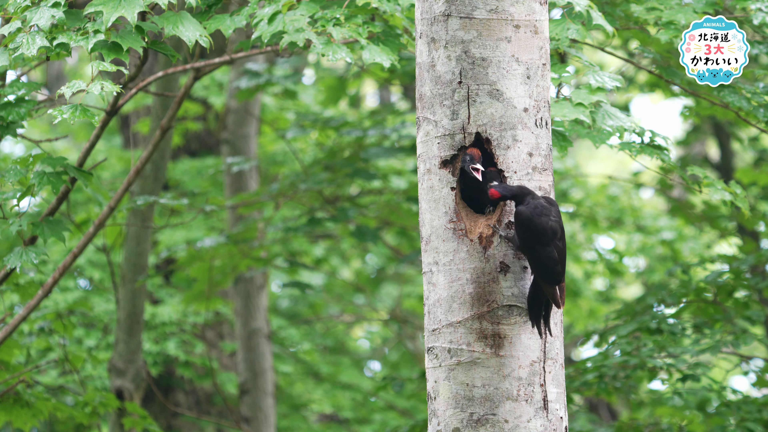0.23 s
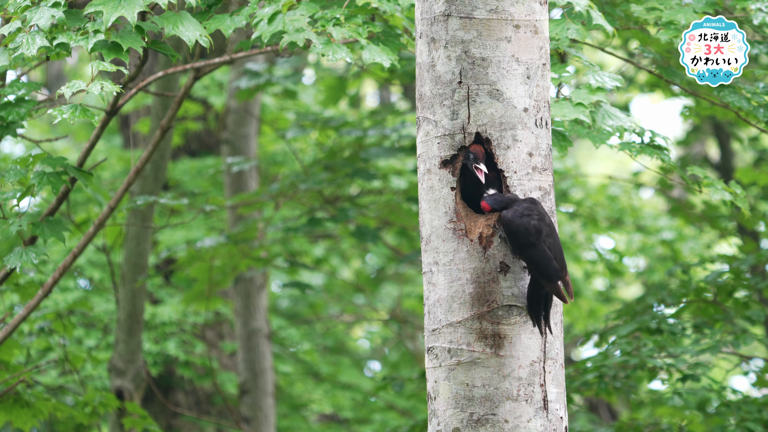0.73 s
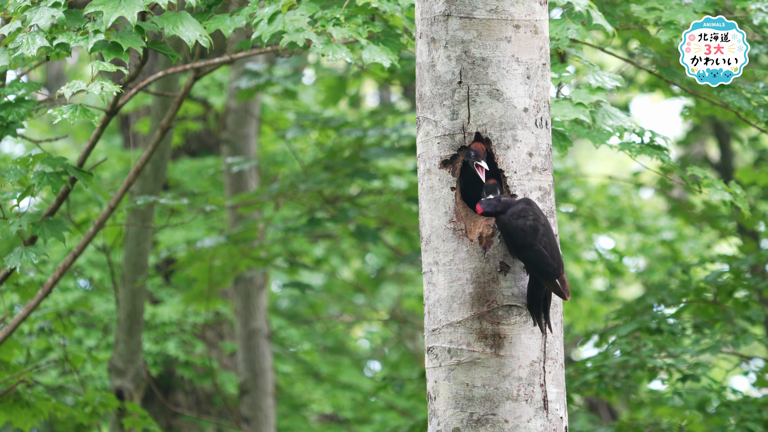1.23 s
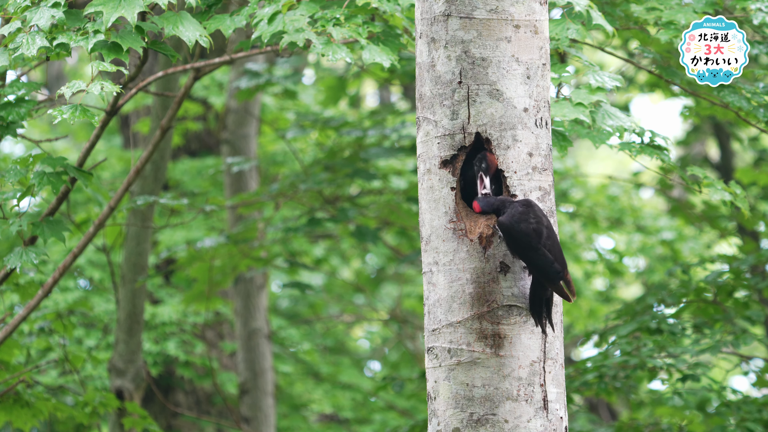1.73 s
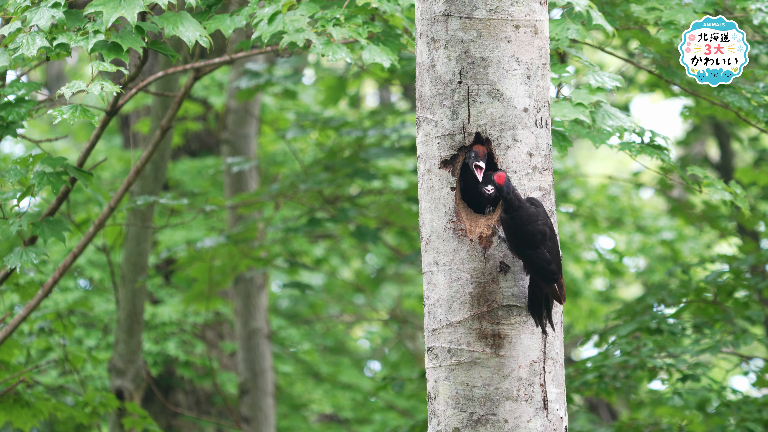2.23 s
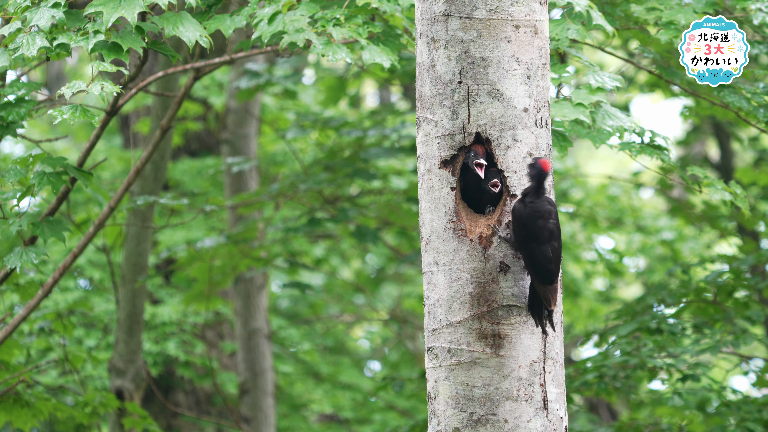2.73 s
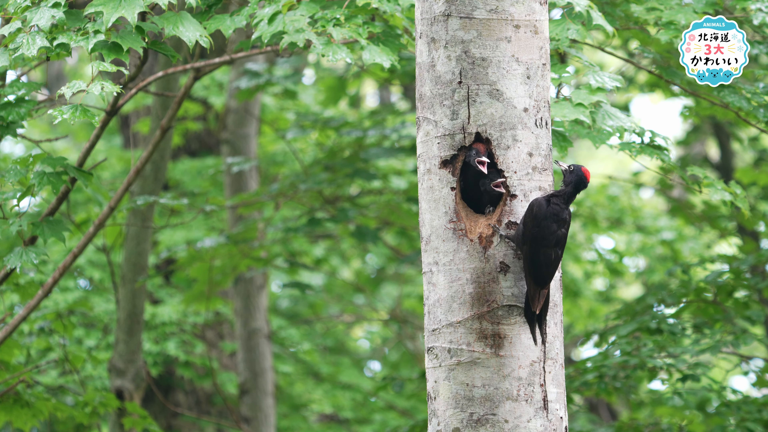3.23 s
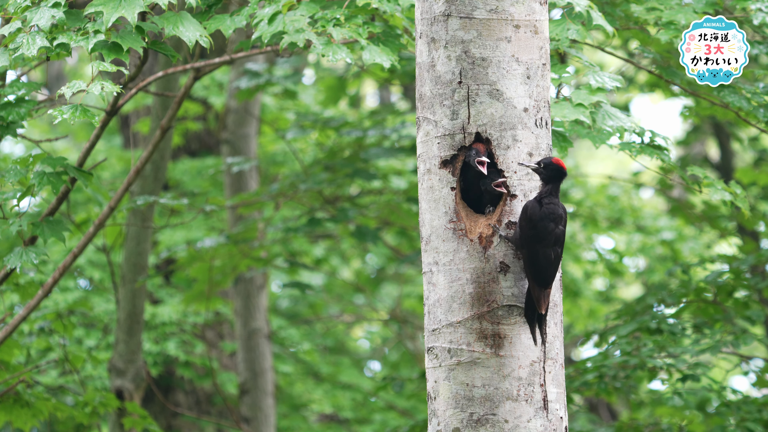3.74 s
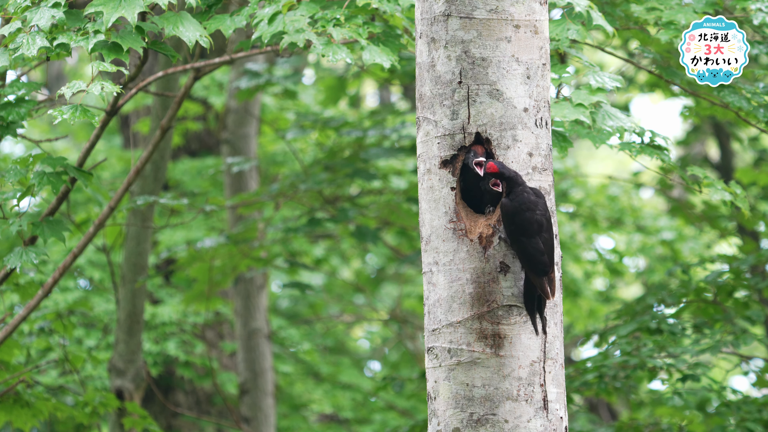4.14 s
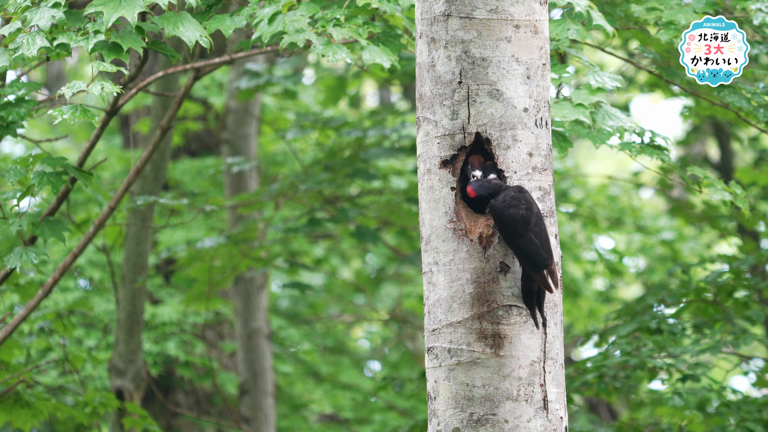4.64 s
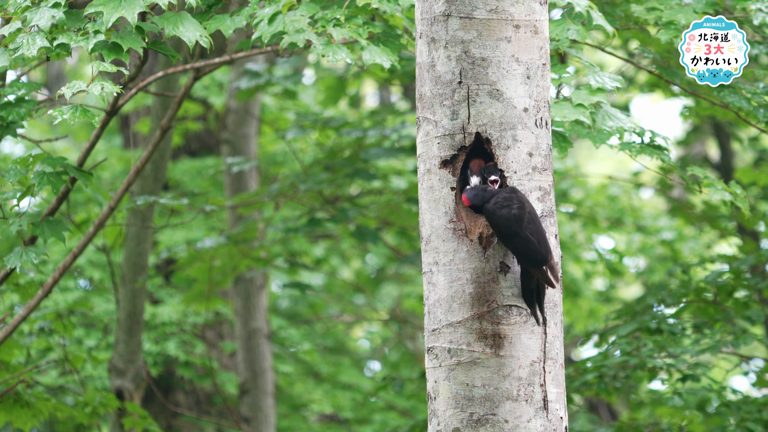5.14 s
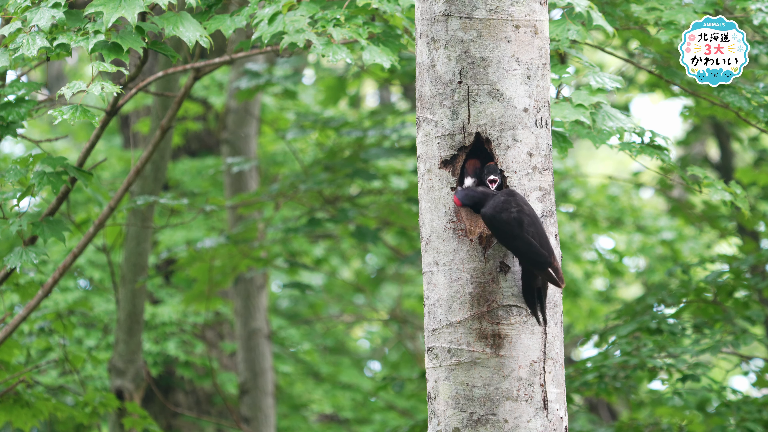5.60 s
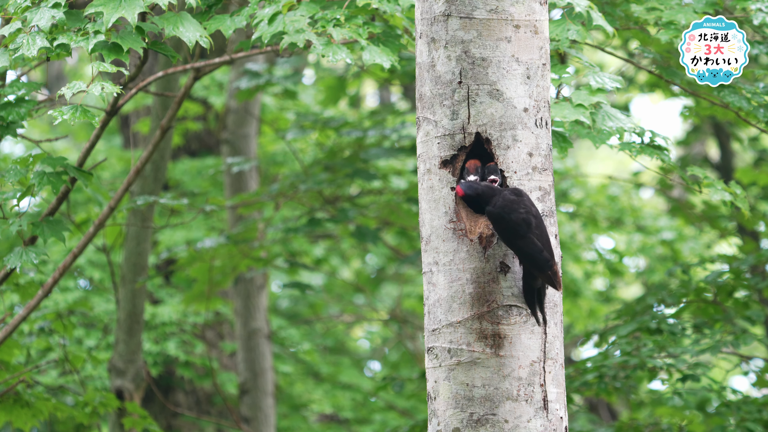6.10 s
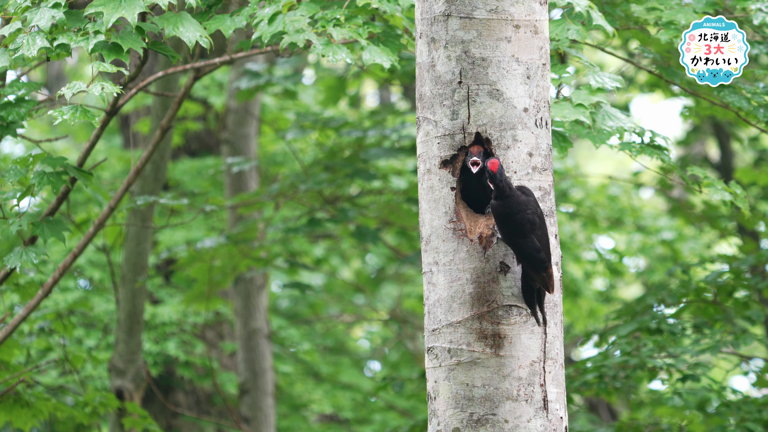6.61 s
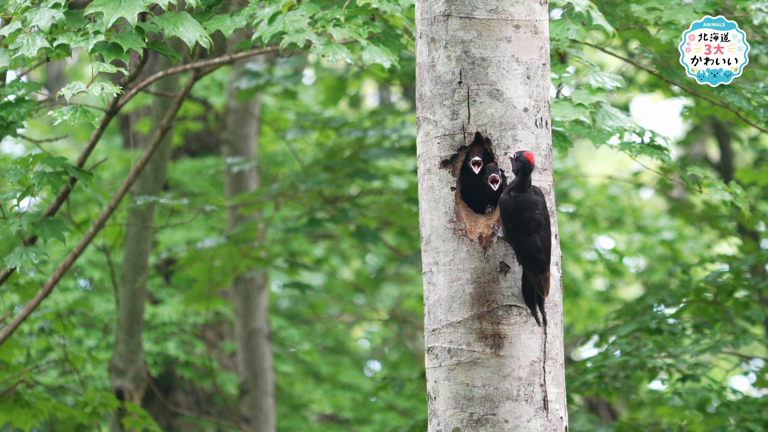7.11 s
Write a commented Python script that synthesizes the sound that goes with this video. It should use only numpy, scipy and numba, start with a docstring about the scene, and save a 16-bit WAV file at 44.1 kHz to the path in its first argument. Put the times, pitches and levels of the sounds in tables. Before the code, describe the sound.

Woodpecker nestlings beg from a tree hole with fast high squeals that turn hoarse, echoing through a leafy forest.

```python
"""Woodpecker nestlings begging from a tree hole, some way off in a leafy forest, on a stereo pair.
About four squeals a second: each is a train of sharp voice pulses that climbs, jumps to an arch and
drops; feeding makes it hoarse, with thin overtones and glides ringing out. Falling squeaks, a few faint
peeps, low blips, scuffling and one bill tap come from the same hole. The trunks echo it all, and leaves
and far rumble fill the gaps."""
import sys
import numpy as np
from scipy import signal
from scipy.fft import rfft, irfft
from scipy.io import wavfile
from scipy.ndimage import uniform_filter1d
from numba import njit

SR = 44100
rng = np.random.default_rng(int(sys.argv[2]) if len(sys.argv) > 2 else 0)


def digitize_waveform(pressure):
    """Quantize a signal to 16-bit integers and store it at the path in sys.argv[1].

    Rows of a 2-D input are taken as channels; values are limited to [-1, 1].
    """
    field = np.atleast_2d(pressure).T
    bounded = np.clip(field, -1, 1)
    quanta = np.round(bounded * 32767).astype(np.int16)
    wavfile.write(sys.argv[1], SR, quanta)


N = 324576
PREROLL = 4410  # samples before the start, so that one squeal is already echoing

# Arched squeals; levels in all tables are relative. Columns: jump_s, lead_s, hump_ahead_s, arch_s,
# hump_hz, dip_hz, top_hz, hump_db, dip_db, arch_db, roughness (0-1), lead_mouth_hz, mouth_hz, beak_db,
# lead_roughness (0-1), fade_db
SQUEALS = [ (-.03, 0.026, 0.016, .03, 1060, 1049, 1290, -24, -27, -20, 0.27, 3700, 3700, 6, 0.364, -5.5),
           (.196, .05, 0.017, .031, 1114, 1030, 1288, -29, -26.5, -19, 0.34, 3230, 4444, 4.5, 0.49, -1),
           (.435, 0.052, .03, 0.028, 1150, 1079, 1320, -27, -24, -19, 0.2, 3430, 4640, 2.5, .25, -1),
           (.672, 0.049, 0.014, .029, 1183, 1085, 1338, -27.5, -22, -21.5, 0.16, 3730, 4207, 4.5, 0.25, -2),
           (0.91, 0.049, 0.03, .032, 1110, 1050, 1309, -32, -26.5, -19.5, 0.11, 3294, 4720, 4, 0.37, -3.5),
           (1.143, .048, 0.022, .034, 1121, 1037, 1255, -33, -24.5, -22.5, 0.12, 3430, 4033, 6, 0.36, -2),
           (1.381, 0.049, .015, .036, 1145, 1043, 1292, -30.5, -23.5, -20.5, 0.13, 3498, 4414, 4.5, .3, -2.5),
           (1.62, .048, 0.012, .034, 1126, 1033, 1307, -30, -21.5, -21.5, .05, 3596, 3850, 5, 0.35, -4),
           (1.86, .045, 0.011, .037, 1202, 1157, 1345, -31.5, -23.5, -23, 0.14, 3450, 4440, 0.5, 0.22, 2.5),
           (2.33, 0.048, .012, .031, 1195, 1237, 1327, -29, -24, -21.5, 0.17, 3730, 4122, 6, .25, -4),
           (2.574, .045, 0.017, .035, 1142, 1042, 1304, -29.5, -27, -22, 0.06, 3310, 3874, 6.5, 0.325, -1),
           (2.822, 0.058, 0.025, .03, 1103, 1068, 1305, -29, -24.5, -18.5, 0.22, 3400, 4820, 4, 0.51, -4),
           (3.067, 0.045, 0.01954, .033, 1164, 1034, 1251, -31, -25.5, -22, 0.45, 3366, 3700, 5.5, 0.537, -4),
           (3.308, 0.058, 0.031, .029, 1090, 1006, 1236, -31, -26.5, -23, 0.5, 3450, 4760, 4.5, 0.59, -1),
           (3.556, 0.048, 0.019, .033, 1054, 1042, 1233, -36, -28.5, -23, 0.59, 3200, 3236, 5, 0.66, -2),
           (3.808, 0.045, 0.023, .036, 1094, 1201, 1259, -29, -22.5, -22, 0.29, 3250, 4900, 5, 0.51, -2.5),
           (4.055, .053, .015, .038, 1133, 1087, 1290, -33.5, -25, -20.5, 0.4, 3300, 5000, 4.5, 0.43, -3),
           (4.288, 0.064, .022, .032, 1144, 1235, 1334, -34.5, -25.5, -23, 0.43, 3600, 3970, 6, 0.5, -1.5),
           (7.221, 0.0476, 0.025, .028, 1201, 1045, 1283, -33.5, -25.5, -20, 0.33, 4200, 4410, 4.5, 0.39, 0)]
# Roughness added along a squeal: lead-in start, hump, landing, top, shoulder, end
SQUEAL_EXTRA_ROUGHNESS = (.25, 0.0388, 0.041, -0.134, -0.0063, 0.1926)
# Resonances of throat, beak, air hissing past the beak, and nest hole: centre_hz, width_hz, gain_db
THROAT_MODES = [(2143.5, 1630, 1), (3700, 3450, 2), (5225, 1540, -1)]
BEAK_MODES = [(6304, 1260, -2.5), (8000, 1500, -4.5)]
BEAK_HISS_MODES = [(10670, 6400, -17)]
HOLE_MODES = [(1035, 47, -3)]
# Soft rising blips, perhaps swallowing: start_s, level_db, pitch_hz, length_s, fall_share (negative)
BLIPS = [(0.348, -52.5, 520, 0.023, -0.044), (1.303, -56, 470.7, 0.026, -0.051),
         (2.103, -43.5, 780, 0.022, -0.056), (2.878, -52, 542, 0.039, -0.06),
         (2.937, -43, 854, 0.024, -0.051), (2.987, -48.5, 555.5, 0.028, -0.057),
         (4.8, -47, 800, 0.0286, -0.066), (5.421, -48.5, 879, 0.026, -0.068),
         (5.669, -53, 685, 0.0302, -0.057), (6.111, -48, 785.4, 0.026, -0.057),
         (6.349, -60, 845, 0.025, -0.072)]
# Thin falling tones: a few faint peeps, then overtones and glides ringing out of the hoarse calls.
# Columns: start_s, level_db, pitch_hz, length_s, fall_share
THIN_TONES = [(1.885, -33, 1715, 0.012, 0.042), (2.098, -31.5, 1815, 0.034, 0.098),
              (3.009, -38.5, 1866, 0.023, 0.074), (3.278, -34.5, 1803, 0.026, 0.045),
              (4.074, -32.5, 1776, 0.02, 0.045), (4.545, -41, 1639, 0.028, 0.019),
              (5.286, -37.5, 1872, .03, 0.0335), (5.505, -36, 1801, 0.031, 0.032),
              (5.777, -32, 2950, .022, 0.366), (5.79, -38.5, 1570, 0.029, 0.38),
              (6.014, -27.5, 2633, 0.034, 0.47), (6.27, -35.5, 1770, 0.021, 0.0484),
              (6.278, -27, 2350, 0.029, 0.06), (6.47, -39, 1752, 0.032, 0.044),
              (6.505, -33.5, 2232, 0.026, 0.098), (6.986, -33, 1800, 0.027, 0.042),
              (6.998, -30, 3307, 0.022, 0.13)]
# Hoarse calls: loudest_s, swell_s, hold_s, pitch_hz, level_db, roughness (0-1), swell_mouth_hz,
# mouth_hz, beak_db
RASPS = [(2.068, 0.0421, 0.039, 1084, -34, 0.39, 3400, 3400, 7),
         (5.288, 0.047, .028, 872, -29.5, 0.28, 3340, 2626, 9),
         (5.512, 0.042, 0.022, 845, -29, .42, 3226, 4870, 6),
         (5.768, 0.041, 0.027, 835, -29.5, 0.38, 3147, 4950, 8),
         (6.001, 0.034, 0.039, 862, -33.5, 0.49, 3447, 3329, 9),
         (6.279, 0.032, 0.023, 815, -29.5, 0.53, 3200, 2420, 5),
         (6.513, 0.044, 0.0241, 795, -31.5, .5, 3470, 4603, 9.5),
         (6.733, 0.037, 0.06, 863, -26.5, 0.34, 5025, 4250, 4),
         (6.988, 0.042, 0.037, 847, -29.5, 0.47, 3432, 3453, 8)]
# Falling squeaks: onset_s, lead_s, length_s, onset_hz, low_hz, lead_db, note_db, roughness (0-1),
# mouth_hz, beak_db
SQUEAKS = [(4.517, .025, .03, 2800, 2173, -33, -24.5, 0.42, 4300, 4.5),
           (4.772, 0.043, 0.02725, 1720, 1469, -39, -24, 0.23, 4232, 0),
           (5.004, 0.028, 0.029, 1772, 1447, -35, -25.5, .12, 4340, 4)]
# Echoes off the trunk and near boughs: left_delay_s, right_delay_s, gain_db
NEAR_ECHOES = [(.00016, 0.000086, -11.5), (.0011, 0.00063, -70), (.0042, 0.0043, -6), (0.028, .036, -8.5)]
# Scatter off the trunks, band by band: centre_hz, t60_s, level_db
TRUNK_ECHO_BANDS = [(506, 0.96, 8.5), (2333, 0.71, 4), (5000, 0.91, 8.5), (10000, 0.62, 9),
                    (16400, 0.21, -5)]
# Spectrum of the forest air around the microphones: frequency_hz, density_db
AMBIENCE_SPECTRUM = [(15, -26), (25, -1.5), (60, 0.5), (130, -8), (260, -11), (380, -12.5), (700, -6),
                     (1500, -3), (3000, -3.5), (7000, -7), (16000, -19.5)]
# How alike that air is in the two capsules: frequency_hz, likeness (0-1)
AMBIENCE_LIKENESS = [(50, 1), (125, 1), (250, 0.77), (1000, 0.26)]
# Swells of the distant low noise: time_s, rumble_db, drone_db
FAR_SWELLS = [(0.0, -60, -73.5), (0.838, -63.5, -64.5), (1.74, -60.5, -72), (3.69, -60, -68.5),
              (4.43, -59.5, -76.5), (4.82, -58, -59.5), (5.16, -60, -67.5), (6.77, -58, -70),
              (7.009, -53, -68), (7.36, -60, -70.5)]
# Colour difference between the capsules: frequency_hz, left_minus_right_db
CAPSULE_BALANCE = [(60, 0.5), (150, -1.5), (600, 3), (1300, 1), (2400, 1), (4400, 1), (8000, -4),
                   (15000, 1.5)]

LEAD_START_DB = -8.5  # a lead-in swells from this far down
BEAK_DB_PER_DB = .4069  # softer calling is breathier: treble gained per dB under the call's full level


def undb(db):
    """dB to gain."""
    return 10 ** (np.asarray(db) / 20)


def unit(x):
    """Scale to rms 1."""
    return x / np.sqrt(np.mean(x ** 2))


def curve_at(table, hz):
    """Read a two-column table along a log-frequency axis."""
    table = np.array(table, float)
    return np.interp(np.log(hz + 1), np.log(table[:, 0]), table[:, 1])


def drift(count, rate_hz):
    """Smooth random wander at about rate_hz, rms 1."""
    span = max(int(SR / rate_hz), 2)
    return unit(uniform_filter1d(uniform_filter1d(rng.standard_normal(count), span), span))


def stereo_noise_spectra(likeness, count):
    """Left and right noise spectra, as alike as asked."""
    mid, side = rfft(rng.standard_normal((2, count)))
    likeness = np.clip(likeness, 0, 1)
    return mid * np.sqrt(1 + likeness) + side * np.sqrt(1 - likeness) * np.array([[1], [-1]])


def ring(x, modes):
    """Sum of steady resonances, neighbours in opposite sign."""
    out = 0
    for k, (hz, width_hz, db) in enumerate(modes):
        g = np.tan(np.pi * hz / SR)
        w = g * width_hz / hz
        band = signal.lfilter([w, 0, -w], [1 + w + g * g, 2 * (g * g - 1), 1 - w + g * g], x)
        out = out + (-1) ** k * undb(db) * band
    return out


@njit
def moving_resonance(x, hz, width_hz):
    """State-variable band-pass with a moving centre, gain 1 at the centre."""
    out, band_state, low_state = np.empty(len(x)), 0., 0.
    for i in range(len(x)):
        g, damping = np.tan(np.pi * hz[i] / SR), width_hz / hz[i]
        band = (band_state + g * (x[i] - low_state)) / (1 + g * (g + damping))
        band_state = 2 * band - band_state
        low_state += 2 * g * band
        out[i] = damping * band
    return out


def squeal(jump_s, lead_s, hump_ahead_s, arch_s, hump_hz, dip_hz, top_hz, hump_db, dip_db, arch_db,
           roughness, lead_mouth_hz, mouth_hz, beak_db, lead_roughness, fade_db):
    """Contour of a squeal: a lead-in swells over a hump into a dip, jumps up to an arch and drops."""
    time_s = jump_s + np.array([-lead_s, -hump_ahead_s, 0, .008, .5 * arch_s, .76 * arch_s, arch_s])
    arch = np.array([.98, 1, .97, .86])  # landing, top, shoulder, end, as shares of the top
    pitch_hz = np.r_[.9 * hump_hz, hump_hz, dip_hz, arch * top_hz]
    level_db = np.r_[hump_db + LEAD_START_DB, hump_db, dip_db, arch_db + np.r_[-1, 0, fade_db / 3, fade_db]]
    extra = np.array(SQUEAL_EXTRA_ROUGHNESS)
    rough = np.r_[lead_roughness + extra[:2], roughness, roughness + extra[2:]]
    mouth = np.r_[[lead_mouth_hz] * 3, arch * mouth_hz]
    treble_db = beak_db + np.r_[BEAK_DB_PER_DB * (arch_db - level_db[:5]), -1, -5]  # the beak closes
    return np.c_[time_s, pitch_hz, level_db, rough, mouth, treble_db]


def nestling_voice(calls, count):
    """Voice pulses, uneven and breathy when rough, ring the throat, mouth, beak and nest hole."""
    points = []  # time_s, pitch_hz, level_db, roughness, mouth_hz, beak_db
    for call in sorted(calls, key=lambda c: c[0, 0]):
        # each call swells in, then fades as pitch and mouth drop
        opening = call[0] - [.025, 0, 22, 0, 0, 0]
        closing = call[-1] * [1, .85, 1, 1, .85, 1] + [.007, 0, -14, 0, 0, 0]
        points += [opening, *call, closing, closing + [.004, 0, -25, 0, 0, 0]]
    point_s, *contours = np.transpose(points)
    time_s = (np.arange(count) - PREROLL) / SR
    hz, db, rough, mouth_hz, beak_db = (np.interp(time_s, point_s, c) for c in contours)
    hz = uniform_filter1d(hz, 110)
    rough = np.clip(rough, 0, 1)
    db = uniform_filter1d(db, 260)  # breath pressure changes smoothly
    # the membrane wanders in pitch and in strength from cycle to cycle, more so when rough
    cycles = np.cumsum(hz * (1 + (.006 + .09 * rough ** 2) * drift(count, 600)) / SR)
    strength = undb((.6 + 1.8 * rough) * drift(count, 600))
    pulses = sum(np.cos(2 * np.pi * k * cycles) * (k * hz < .4 * SR) for k in range(1, 20))
    pulses /= np.sqrt(np.minimum(.4 * SR / hz, 19) / 2)
    air = rng.standard_normal(count) * (1 + .5 * np.cos(2 * np.pi * cycles))  # one rush a cycle
    voice = undb(db) * strength * (np.sqrt(1 - .46 * rough ** 2) * pulses + 1.89 * rough ** 2 * air)
    voice += 1e-18
    # the small throat passes little below its first resonance
    low_cut = signal.butter(2, 1550, "high", fs=SR, output="sos")
    throat = signal.sosfilt(low_cut, ring(voice, THROAT_MODES))
    mouth = undb(6) * moving_resonance(throat, mouth_hz, width_hz=750.)
    snap = undb(np.minimum(.8 * (db + 23), 0))  # soft calling puts few sharp pulses into the beak
    breath = undb(db) * (.4 + rough) * air  # a clear voice leaks less air
    beak = ring(undb(beak_db) * (snap * voice + .36 * breath), BEAK_MODES)
    hiss = ring(undb(beak_db) * (1.2 * snap * voice + breath), BEAK_HISS_MODES)
    return undb(3.5) * (throat + mouth + beak + hiss + ring(voice, HOLE_MODES))


def forest_response(size=44100, boughs_t60_s=.22, rise_s=.018):
    """From hole to microphones: direct sound, near echoes, then scatter off trunks that fades by band."""
    time_s, hz = np.arange(size) / SR, np.fft.rfftfreq(size, 1 / SR)
    scatter = stereo_noise_spectra(.03, size)
    tail = 0
    for k, (_, t60_s, db) in enumerate(TRUNK_ECHO_BANDS):
        band = curve_at([(row[0], j == k) for j, row in enumerate(TRUNK_ECHO_BANDS)], hz)
        trunks = undb(db - 60 * time_s / t60_s)
        boughs = undb(db + 3.5 - 60 * time_s / boughs_t60_s)  # quick first part of the echo
        tail = tail + (trunks + boughs) * irfft(scatter * band, size)
    clumps = undb(2 * drift(size, 90))  # the trunks stand unevenly
    tail *= (1 - np.exp(-time_s / rise_s)) * clumps
    tail *= undb(-3.5) / np.sqrt(np.sum(tail ** 2) / 2)
    near = sum(undb(db) * np.exp(-2j * np.pi * hz * np.array([[left_s], [right_s]]))
               for left_s, right_s, db in NEAR_ECHOES)
    return tail + irfft(1 + near, size) * (time_s < .05)


def leaves_and_rumble():
    """Leaf hiss all around, a low drone and far rumble, each swelling on its own."""
    hz = np.fft.rfftfreq(N, 1 / SR)
    noise = stereo_noise_spectra(curve_at(AMBIENCE_LIKENESS, hz), N)
    noise *= undb(curve_at(AMBIENCE_SPECTRUM, hz))
    low, high = curve_at([(140, 1), (200, 0)], hz), curve_at([(350, 0), (500, 1)], hz)
    rumble, drone, leaves = (unit(irfft(noise * band, N)) for band in (low, 1 - low - high, high))
    swell_s, *levels_db = np.transpose(FAR_SWELLS)
    rumble_db, drone_db = (np.interp(np.arange(N) / SR, swell_s, db) for db in levels_db)
    leaves_db = -46 + 1.5 * drift(N, 4)
    return undb(rumble_db) * rumble + undb(drone_db) * drone + undb(leaves_db) * leaves


def scuffle(count):
    """Bodies shift in the nest hole and its hollow rings softly, in irregular patches."""
    rub = undb(7 * drift(count, 25)) * rng.standard_normal(count)
    return undb(-65.5) * unit(ring(rub, [(513, 670, -7.5), (823, 640, 3.5)]))


def gliding_tones(table, count, octave_db, waver_share):
    """Low blips or thin tones: short and near-pure, they waver and glide, with a weak octave."""
    out = np.zeros(count)
    waver = waver_share * drift(count, 330)
    for start_s, level_db, pitch_hz, length_s, fall_share in table:
        progress = np.arange(int(length_s * SR)) / (length_s * SR)
        start = int(start_s * SR) + PREROLL
        span = slice(start, start + len(progress))
        hz = pitch_hz * (1 - fall_share * (progress - .5) + waver[span])
        phase = 2 * np.pi * np.cumsum(hz) / SR
        tone = np.sin(phase) + undb(octave_db) * np.sin(2 * phase)
        out[span] += undb(level_db) * np.sin(np.pi * progress) * tone
    return out


def rasp(loudest_s, swell_s, hold_s, hz, db, roughness, swell_mouth_hz, mouth_hz, beak_db):
    """Contour of a low hoarse call: it swells, catches briefly into a clearer note, and sags."""
    time_s = loudest_s + np.array([-swell_s, -swell_s / 2, -.003, 0, .016, .02103, hold_s])
    pitch_hz = [hz] * 6 + [.89 * hz]
    level_db = db + np.array([-20, -9.5, -3, 0, 0, -1.25, -2.5])
    rough = roughness + .28 * np.array([1.3, 1, 1, 0, 0, .9, 1])
    mouth = [swell_mouth_hz] * 3 + [mouth_hz] * 3 + [swell_mouth_hz]
    treble_db = beak_db + BEAK_DB_PER_DB * (db - level_db)
    return np.c_[time_s, pitch_hz, level_db, rough, mouth, treble_db]


def squeak(onset_s, lead_s, length_s, onset_hz, low_hz, lead_db, note_db, roughness, mouth_hz, beak_db):
    """Contour of a squeak: breath, then a clear note that falls fast and lifts a little."""
    time_s = onset_s + np.array([-lead_s, -.003, 0, .011, .6926 * length_s, length_s])
    pitch_hz = [onset_hz] * 3 + [low_hz, low_hz, 1.02 * low_hz]
    level_db = np.r_[lead_db + LEAD_START_DB, lead_db, note_db + np.array([-4.5, 0, 0, -3.5])]
    rough = [.85, .8, .3] + [roughness] * 3
    mouth = [3170] * 4 + [mouth_hz] * 2
    treble_db = beak_db + BEAK_DB_PER_DB * (note_db - level_db)
    return np.c_[time_s, pitch_hz, level_db, rough, mouth, treble_db]


def bill_tap(count, start_s=6.2925, pitch_hz=900, length_s=.0016):
    """The parent's bill knocks once on the wood: dull, little more than a single cycle."""
    out = np.zeros(count)
    time_s = np.arange(int(length_s * SR)) / SR
    envelope = undb(-35) * np.sin(np.pi * time_s / length_s)
    start = int(start_s * SR) + PREROLL
    out[start:start + len(time_s)] = envelope * np.sin(2 * np.pi * pitch_hz * time_s)
    return out


def scene():
    """The nest heard from some way off through the trees, over leaves and far rumble."""
    count = N + PREROLL
    calls = [squeal(*row) for row in SQUEALS]
    calls += [rasp(*row) for row in RASPS] + [squeak(*row) for row in SQUEAKS]
    begging = nestling_voice(calls, count)
    thin_tones = gliding_tones(THIN_TONES, count, octave_db=-8, waver_share=.0061)
    blips = gliding_tones(BLIPS, count, octave_db=-13.5, waver_share=.032)
    nest = undb(-1.5) * (begging + thin_tones + blips + scuffle(count) + bill_tap(count))
    distant_nest = signal.fftconvolve(nest[None], forest_response(), axes=1)[:, PREROLL:count]
    return distant_nest + leaves_and_rumble()


def record(dry):
    """The stereo pair: the two capsules differ a little in colour, and the top is cut at 15.9 kHz."""
    tilt_db = curve_at(CAPSULE_BALANCE, np.fft.rfftfreq(N, 1 / SR)) / 2
    coloured = irfft(rfft(dry) * undb([tilt_db, -tilt_db]), N)
    return signal.sosfilt(signal.ellip(10, .2, 80, 15900, fs=SR, output="sos"), coloured)


dry = scene()
out = record(dry)
digitize_waveform(out)
```